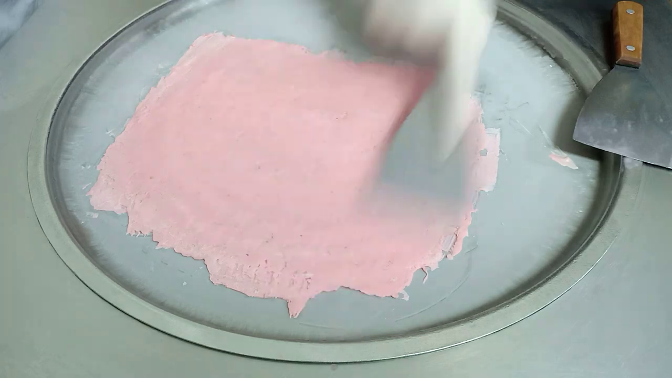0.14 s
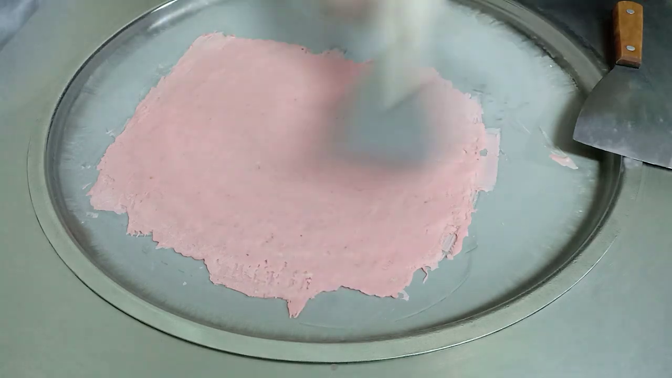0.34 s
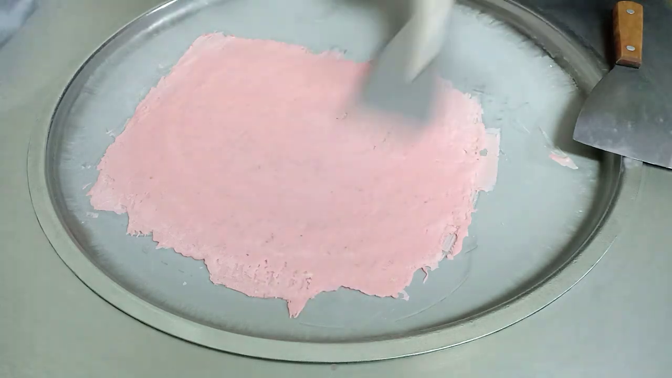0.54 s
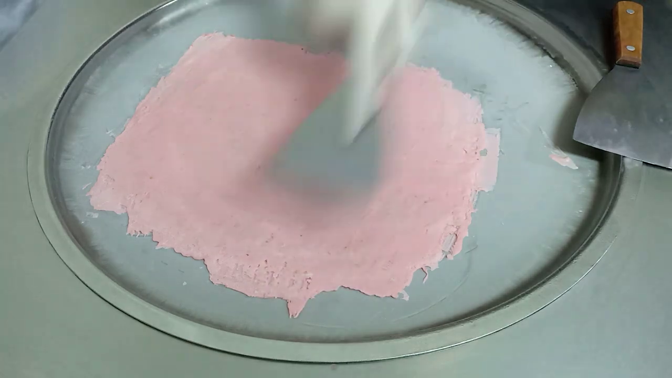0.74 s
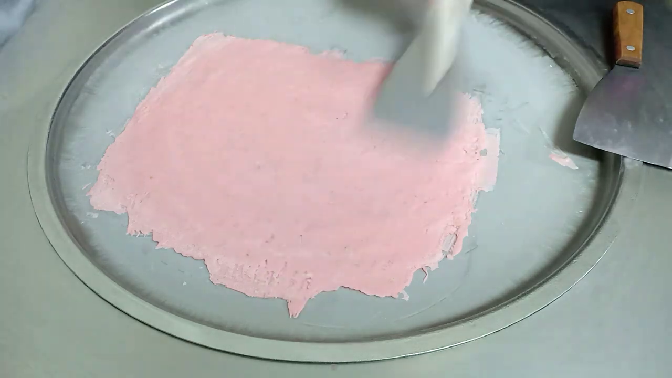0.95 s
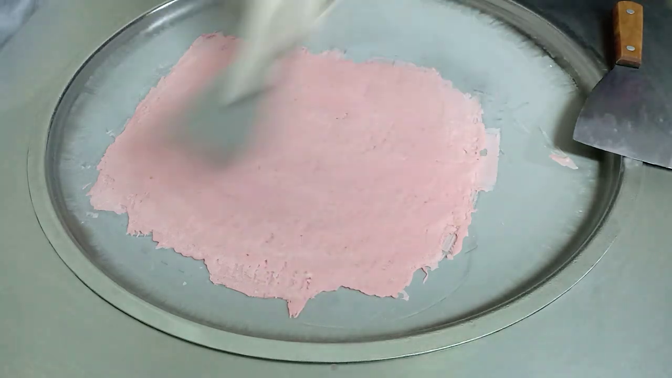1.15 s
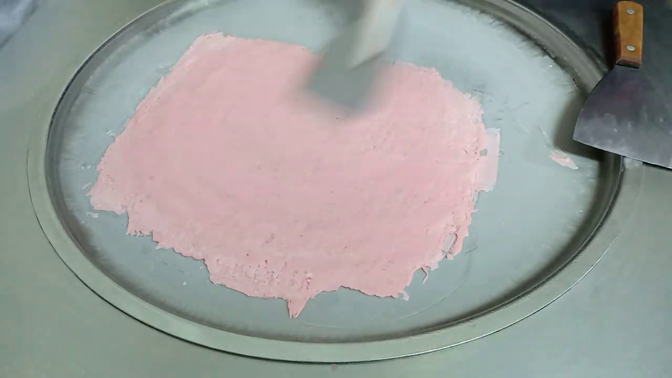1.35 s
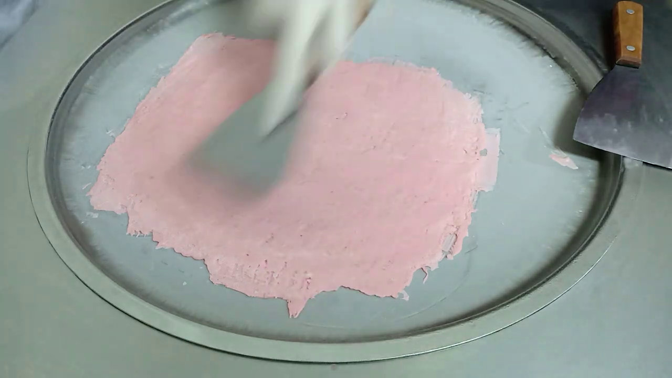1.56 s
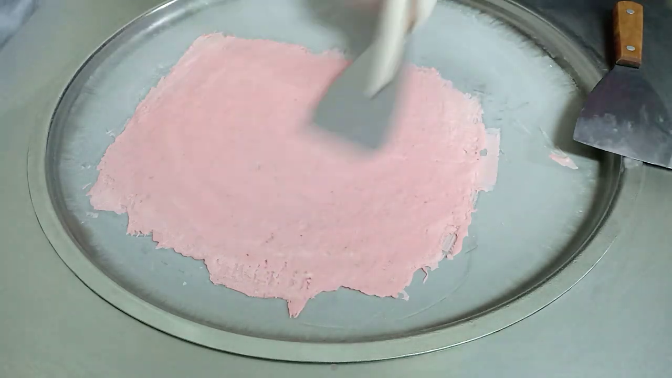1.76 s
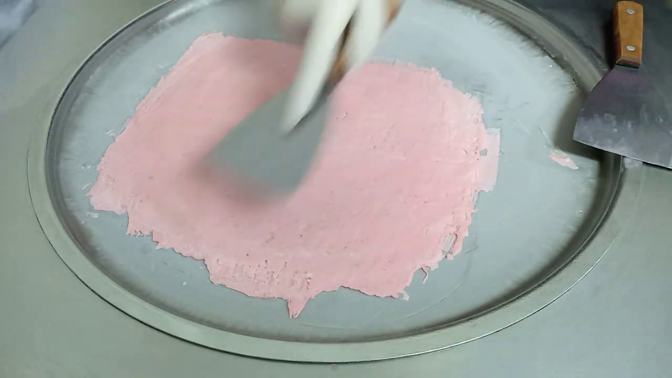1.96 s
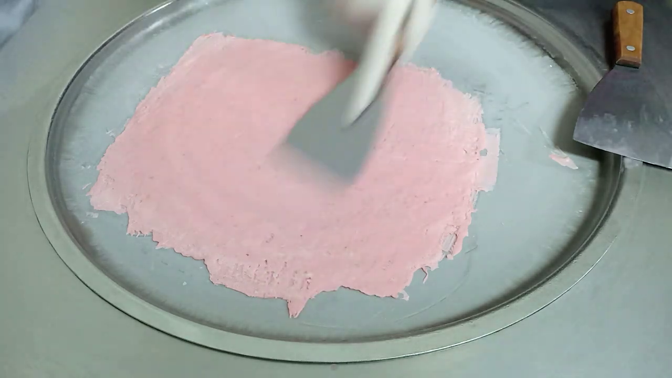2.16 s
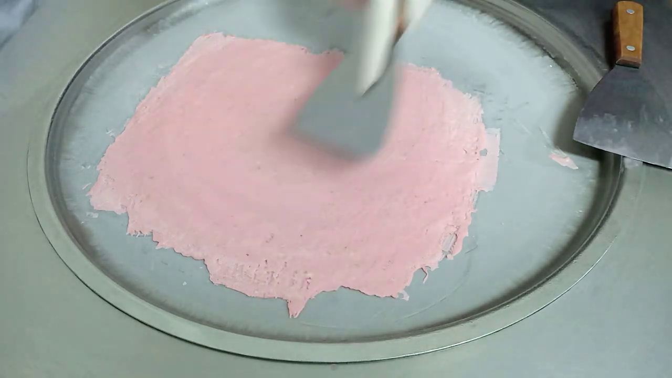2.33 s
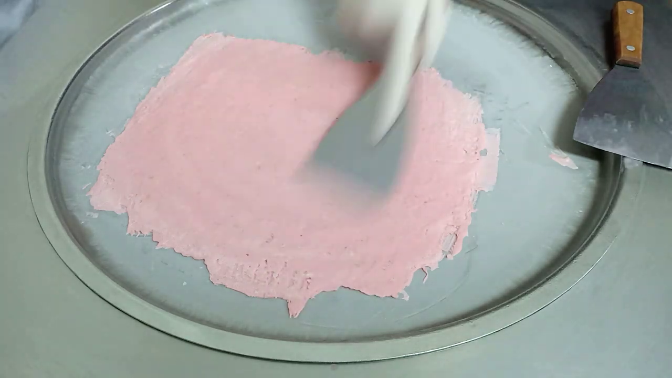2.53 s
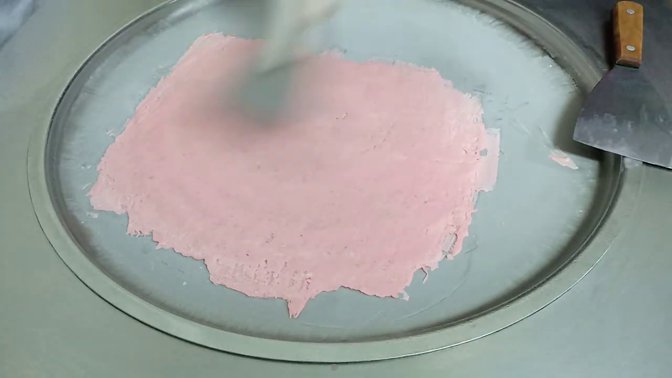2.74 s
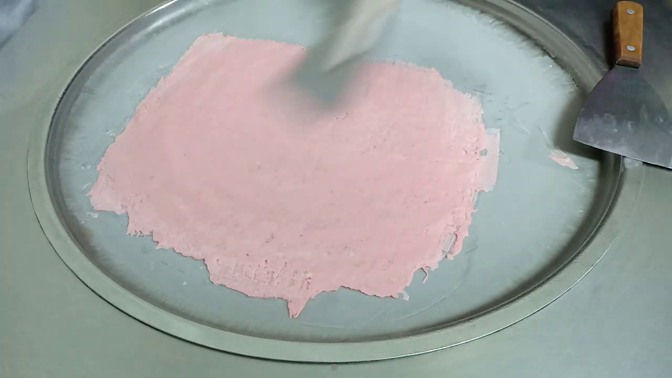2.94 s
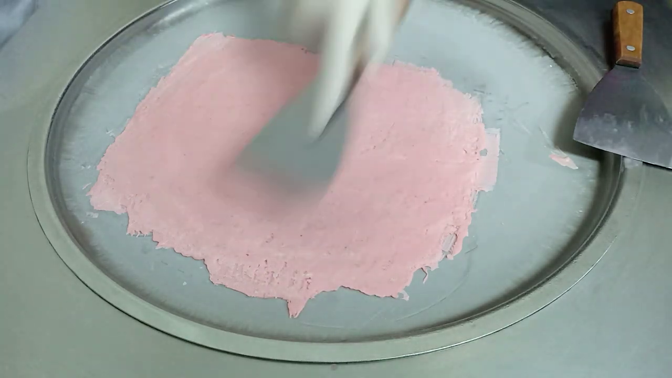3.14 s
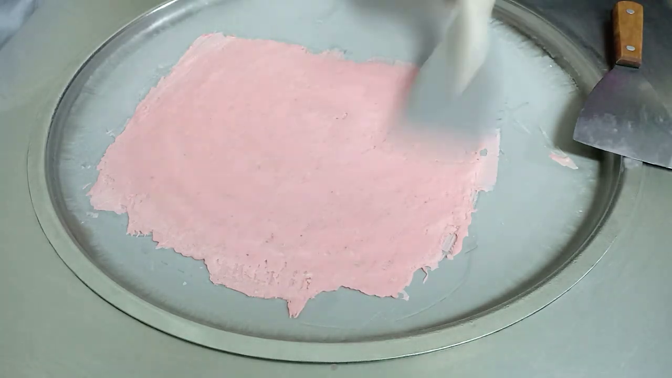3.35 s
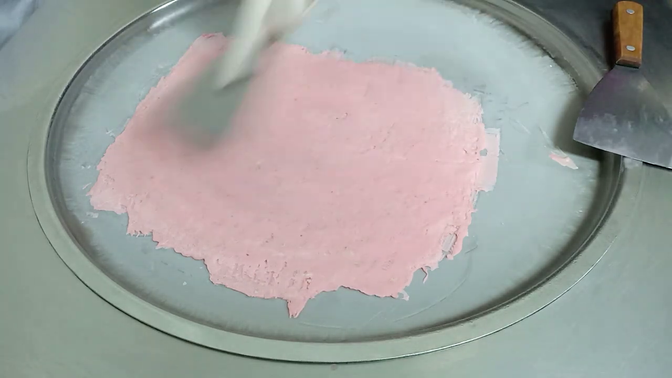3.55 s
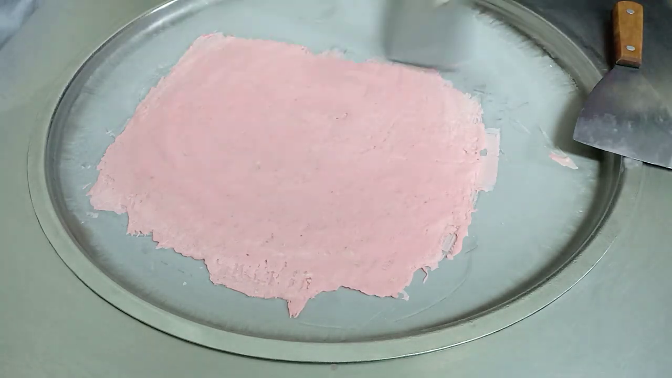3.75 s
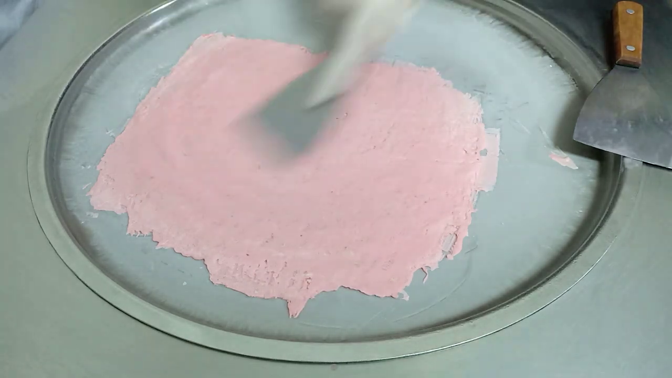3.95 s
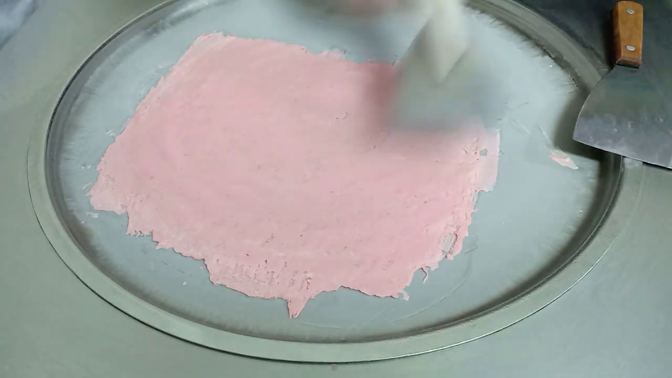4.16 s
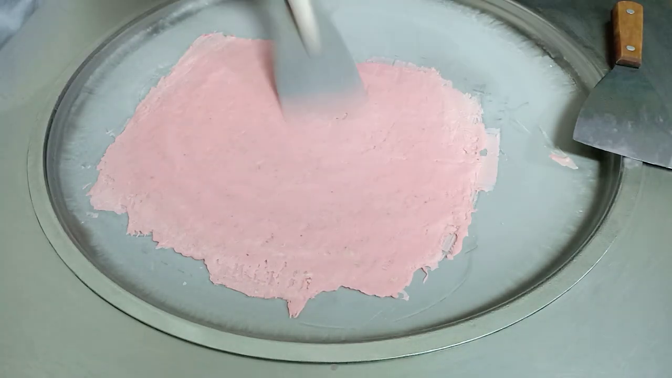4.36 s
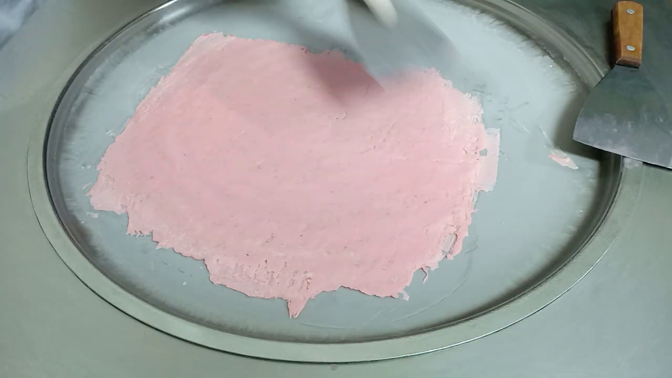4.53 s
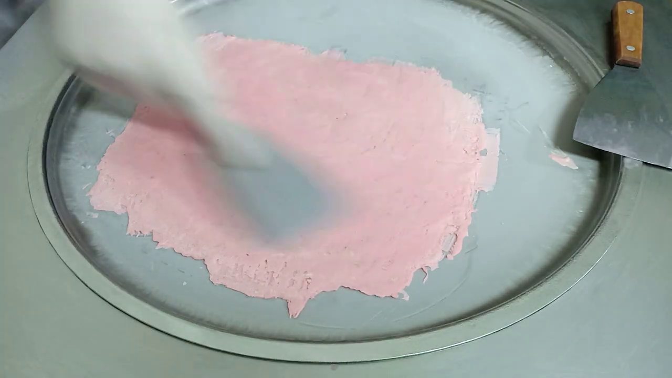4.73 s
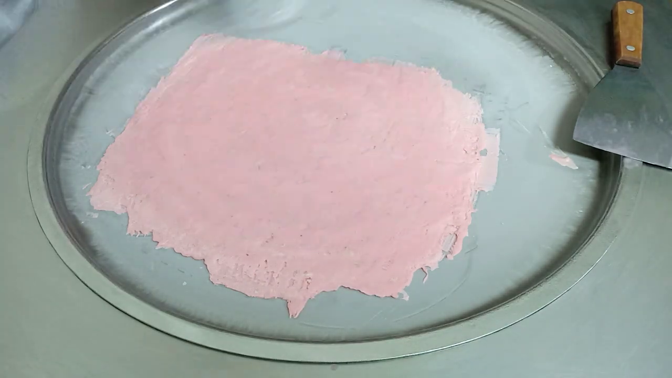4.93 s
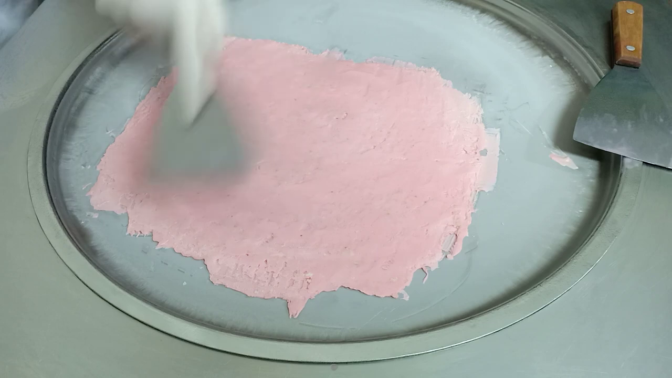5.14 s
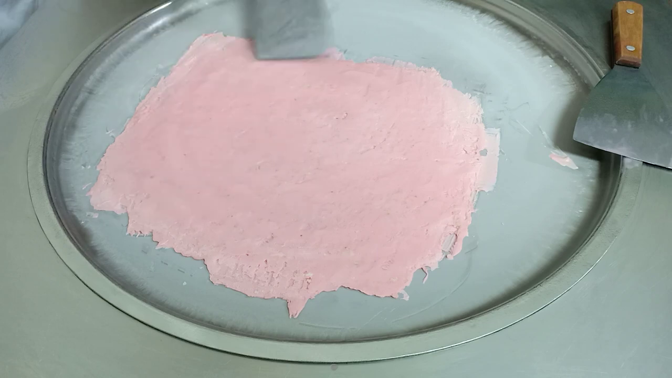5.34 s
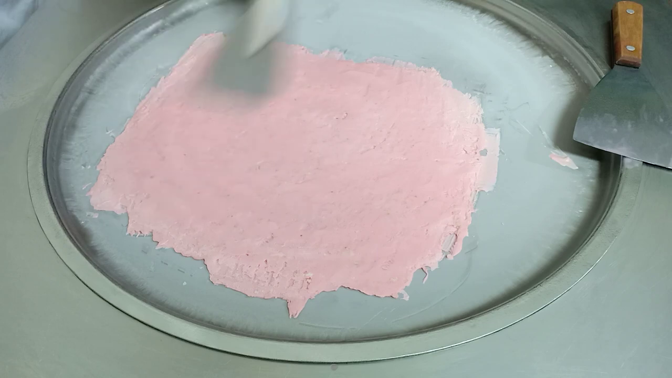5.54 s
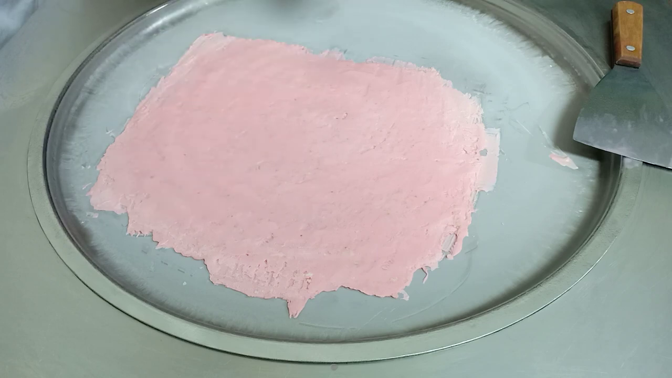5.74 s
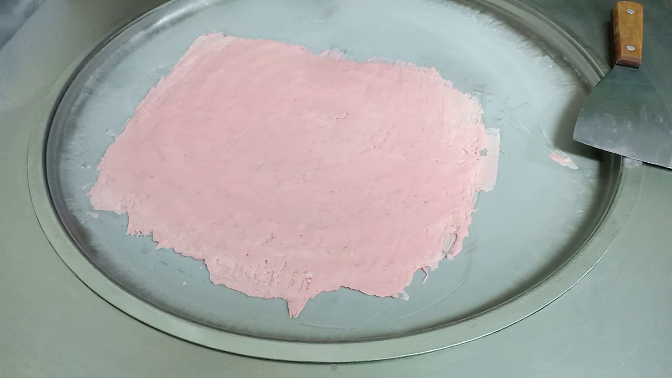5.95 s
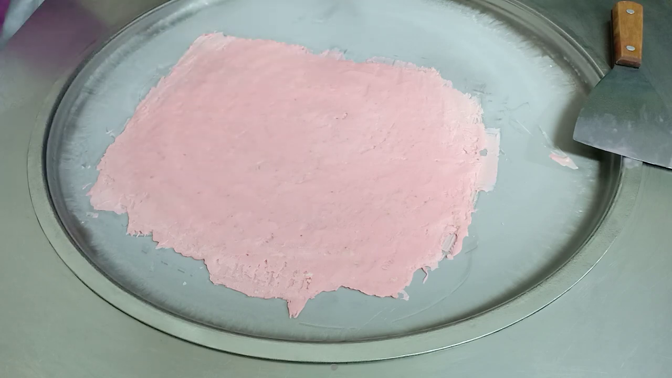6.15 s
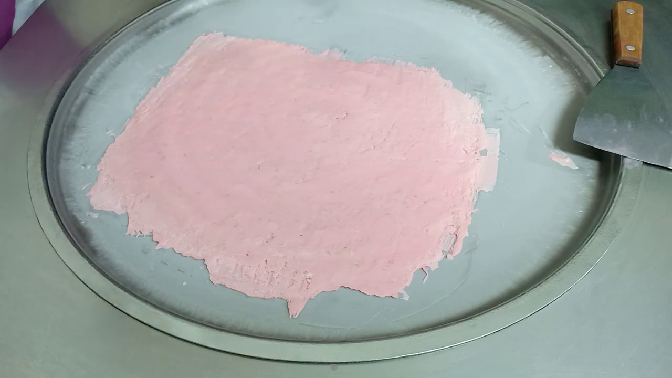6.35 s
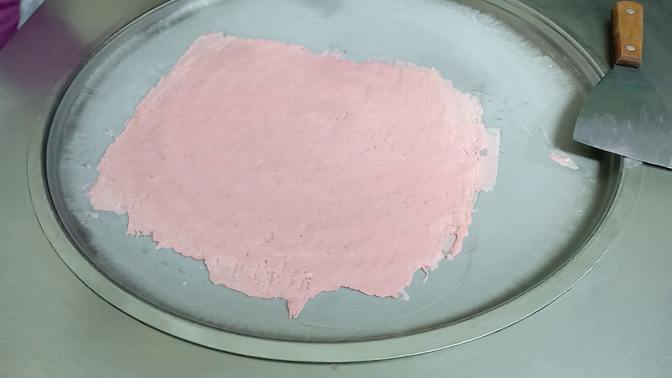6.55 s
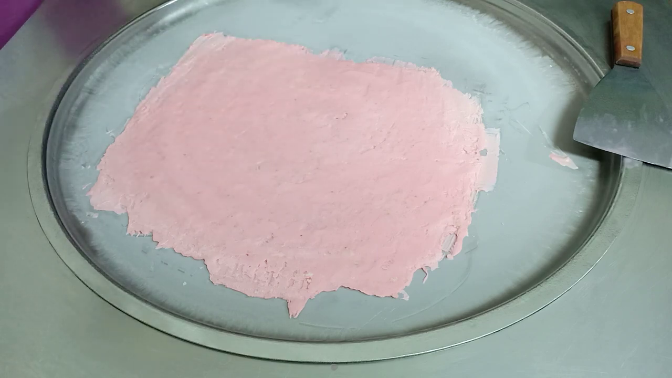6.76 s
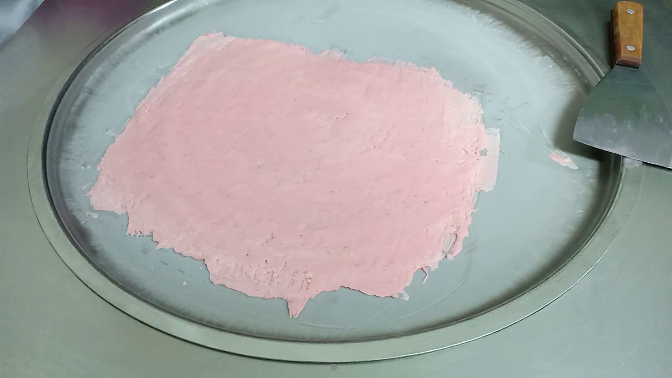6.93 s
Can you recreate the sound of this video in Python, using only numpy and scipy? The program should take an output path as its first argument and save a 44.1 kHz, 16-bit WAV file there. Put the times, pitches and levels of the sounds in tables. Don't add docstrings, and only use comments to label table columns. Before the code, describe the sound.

A metal spatula slaps and scrapes frozen cream on a cold steel plate in brisk regular strokes, then stops, leaving faint machine hum and tiny clicks.

```python
import sys
import numpy as np
from scipy import signal
from scipy.fft import rfft, irfft
from scipy.io import wavfile
from scipy.ndimage import uniform_filter1d

SR = 44100
rng = np.random.default_rng(int(sys.argv[2]) if len(sys.argv) > 2 else 0)


def put_to_file(sound):
    columns = np.atleast_2d(sound).T
    safe = np.clip(columns, -1, 1)
    whole_steps = np.round(safe * 32767)
    wavfile.write(sys.argv[1], SR, whole_steps.astype(np.int16))


def amplitude_ratio(level_db):
    exponent = np.asarray(level_db, float) / 20
    return 10 ** exponent


N = 308259


def unit(x):
    return x / np.sqrt(np.mean(x ** 2))


def on_log_hz(table, size):
    hz, value = np.transpose(table)
    bins_hz = np.arange(size // 2 + 1) * SR / size
    return np.interp(np.log(bins_hz + 1), np.log(hz), value)


def colour(x, table, even=False):
    size, spectrum = x.shape[-1], rfft(x)
    log_gain = np.log(amplitude_ratio(on_log_hz(table, size)))
    if even:
        smooth_power = uniform_filter1d(np.abs(spectrum) ** 2, size=size // 64)
        log_gain = log_gain - np.log(smooth_power + 1e-18) / 2
    cepstrum = irfft(log_gain, size)
    cepstrum[..., 1:size // 2] *= 2
    cepstrum[..., size // 2 + 1:] = 0
    return irfft(spectrum * np.exp(rfft(cepstrum)), size)


def above(x, hz):
    return signal.sosfilt(signal.butter(4, hz, "high", fs=SR, output="sos"), x)


def ring(x, hz, width_hz):
    return signal.lfilter(*signal.iirpeak(min(hz, .45 * SR), hz / width_hz, fs=SR), x)


def body(x, modes):
    return sum((-1) ** k * amplitude_ratio(db) * ring(x, hz, width) for k, (hz, width, db) in enumerate(modes))


def blend(mid, side, likeness):
    c = np.clip(likeness, 0, 1)
    return np.sqrt(1 + c) * mid + np.sqrt(1 - c) * side * np.array([[1], [-1]])


def pair(size, likeness):
    mid, side = rng.standard_normal((2, size))
    return blend(mid, side, likeness)


def flicker(rate):
    hold = int(SR / rate)
    steps = np.repeat(rng.standard_normal(N // hold + 1), hold)
    return unit(uniform_filter1d(steps, hold)[:N])


def add(out, sound, s):
    i = int(s * SR)
    out[:, i:i + sound.shape[1]] += sound[:, :N - i]


# start in seconds [s], peak level [dB], clack centre [Hz],
# blade brightness [dB], left minus right [dB].
SLAP_EVENTS = [(0.0948, -6, 2290, -28, 0.5), (0.483, -7, 1540, -13, -4.5), (0.8653, -4, 2010, -15, -1.5),
               (1.288, -4, 3030, -7.5, -4.5), (1.6698, -4.5, 2160, 0.5, -6), (2.0995, -7.5, 2290, -13, -1),
               (2.5151, -14, 2840, -16.5, -4), (2.8841, -20.5, 1630, -8, -6), (3.263, -3, 1480, -3, 0),
               (3.6604, -8.5, 2280, -5, 2), (3.9862, -7, 2900, -10.5, -1.5),
               (4.2921, -3.5, 2120, -12.5, -4.5), (4.6962, -24, 2680, -7, -1),
               (5.2345, -3.5, 1760, -19.5, -1.5), (5.5492, -4.5, 2130, -4, -1)]
# delay [s], bounce level [dB], edge sizzle [dB].
BLADE_BOUNCES = [(.0029, -9, 3.5), (.0027, 0, -0.5), (.0031, -4.5, -1), (.0023, 2, 2), (.003, -6.5, 4.5),
                 (.0036, -0.5, 3), (0.0036, -1.5, -1.5), (.0023, -9, 7), (.0033, -4, 2.5),
                 (.0026, -4.5, -21), (0.00085, 0, -11), (.0027, 3.5, .5), (.0025, 1.5, -18),
                 (0.0032, -12.5, 0), (0.0018, -8, -6.5)]
# frequency [Hz], level [dB per Hz].
CLACK_COLOUR = [(180, -31), (300, -3.5), (1020, -12), (1450, -5.5), (2170, -1.5), (3300, -9), (4770, -5.5),
                (7630, -16.5), (9980, -29.5), (11600, -19), (14000, -20.5), (16500, -38)]
# frequency [Hz], width [Hz], level [dB].
BLADE_TONES = [(1440, 53, 1.5), (2060, 98, -3), (2290, 60, -8.5), (2320, 120, -6.5), (2745, 80, -6.5),
               (4524, 150, -12.5), (4745, 190, -11), (5800, 66, -13)]


def strike(since):
    return np.clip(since / 0.00029, 0, None) * np.exp(1 - np.abs(since) / 0.00055)


def slaps():
    out, t = np.zeros((2, N)), np.arange(SR // 4) / SR
    for (s, db, hz, bright_db, pan_db), (delay, bounce_db, sizzle_db) in zip(SLAP_EVENTS, BLADE_BOUNCES):
        force = strike(t) + amplitude_ratio(bounce_db + 6.5) * strike(t - delay)
        force = force + .2 * np.exp(-t / .004) + .06 * np.exp(-t / 0.0084)
        crack = colour(pair(len(t), 0.76) * force, CLACK_COLOUR, even=True)
        clack = crack + 2.01 * ring(crack, hz, 500)
        clack += amplitude_ratio(bright_db + 14.5) * ring(crack, 4600, 1700)
        clack += 0.52 * body(crack, BLADE_TONES)
        clack += (amplitude_ratio(sizzle_db) - 1) * above(crack, 6500)
        level = amplitude_ratio(db + 3.5 + np.array([[pan_db], [-pan_db]]) / 2)
        add(out, level * clack / np.abs(clack.mean(0)).max(), s - .0004)
    return out


# start in seconds [s], pat peak [dB], pat pitch [Hz], thump peak [dB].
CREAM_PATS = [(0.096, -21.5, 1470, -26), (0.4834, -7.5, 1526, -36), (0.8632, -14.5, 1610, -25.5),
              (1.2853, -6, 1690, -22.5), (1.6669, -20, 1090, -42), (2.0976, -16, 1190, -29.5),
              (2.5126, -14.5, 600, -41), (2.8836, -12, 706, -30.5), (3.2623, -5, 1530, -32),
              (3.6588, -12.5, 695, -22), (3.983, -8.5, 1600, -32), (4.292, -6, 1430, -59),
              (4.694, -31, 557, -32), (5.234, -13.5, 1098, -34.5), (5.5479, -12, 910, -27.5)]
# frequency [Hz], width [Hz], level [dB].
PLATE_TONES = [(74.9, 14, -17), (118.9, 8, -6), (166.8, 12.2, -0.5), (235.5, 36.6, -8), (259.4, 18, -2),
               (327.5, 13.1, -1), (441.7, 15, -6.5), (517.3, 14, -10), (588, 19, -9), (672.7, 21, -13),
               (756, 8.4, -22)]


def pats():
    out, t = np.zeros((2, N)), np.arange(SR // 2) / SR
    push = np.sin(np.pi * np.clip(t / .003, 0, 1)) ** 2
    for s, pat_db, hz, thump_db in CREAM_PATS:
        pull = -np.sin(2 * np.pi * hz * t) * np.exp(-t * hz / 0.6)
        squash = ring(ring(pair(len(t), 0.4), 2600, 3500), 2600, 3500)
        squash = unit(ring(squash, 2600, 5000)) * np.exp(-t / 0.00038)
        soft_start = 1 - np.exp(-(t / 0.00031) ** 2)
        pat = (pull + 0.41 * squash) * soft_start
        thump = -body(push * (1 + .5 * pair(len(t), .9)), PLATE_TONES)
        add(out, amplitude_ratio(pat_db + 3.5) * pat + amplitude_ratio(thump_db - 3.0) * thump / np.abs(thump).max(), s)
    return out


BOOM_PEAKS_DB = [-29.5, -38.5, -42.5, -34.5, -35, -37.5, -38.5, -30, -35, -36.5, -35.5, -37, -50, -37,
                 -28.5]


def booms():
    boom_hz, split_hz, t60_s = 167.8, 7.4, 0.87
    out, t = np.zeros((2, N)), np.arange(SR) / SR
    beating = np.sin(np.pi * split_hz * t) * np.sin(2 * np.pi * boom_hz * t)
    tone = beating * amplitude_ratio(-60 * t / t60_s)
    for (s, *_), db in zip(SLAP_EVENTS, BOOM_PEAKS_DB):
        add(out, amplitude_ratio(db) * np.tile(tone / tone.max(), (2, 1)), s)
    return out


# hiss level [dB], hiss fade [dB per s], contact time [s],
# plate drum level [dB], drum hold [s].
DRAG_STROKES = [(-22.5, 116, 0.16, -29, 0.087), (-25.5, 192, .12, -30, 0.036), (-26, 137, 0.14, -30.5, .03),
                (-29, 114, 0.14, -33, .08), (-28.5, 141.5, 0.15, -31, 0.014), (-35, 81, .12, -31.5, 0.016),
                (-29, 170, 0.126, -36, .05), (-36.5, 62, 0.1, -30.5, 0.02), (-30, 100, 0.053, -31.5, .02),
                (-33, 11.5, 0.047, -30.5, 0.065), (-30.5, 174, .1, -32.5, 0.048),
                (-28.5, 86.5, 0.19, -28.5, 0.015), (-45.5, 2.5, 0.22, -38, 0.11),
                (-30, 111, .11, -31.5, 0.016), (-28, 84, 0.059, -31.5, 0.057)]
# peak time [s], hiss level [dB],
# plate drum level [dB], blade tone share [dB], hiss fade [dB per s].
WRIST_PRESSES = [(0.0, -69.5, -39.5, -7, 202), (0.261, -33, -36, -4, 217), (0.593, -41, -43.5, -12.5, 152),
                 (1.043, -44, -40.5, -8.5, 250), (1.445, -48, -42, -11, 155.5), (1.8, -44, -43.5, -8, 156),
                 (2.25, -49, -44, -10, 117), (2.658, -39, -35.5, -9, 232), (3.015, -42, -39, -13, 182),
                 (3.324, -32.5, -37, -7, 169), (3.442, -33.5, -33.5, -10, 244),
                 (4.06, -34.5, -34.5, -26, 190), (4.453, -45.5, -42, -8.5, 350),
                 (4.61, -49.5, -51.5, -20, 63), (4.975, -30.5, -30.5, -4, 234), (5.367, -40, -37, -12, 178),
                 (5.51, -54.5, -41, 0, 194)]


def peak_db(since, rise, fade):
    return np.where(since < 0, rise * since, -fade * since)


def stroke_curves():
    t = np.arange(0, N / SR + .002, .001)
    falls = np.array([0] + [slap[0] for slap in SLAP_EVENTS] + [t[-1] + 1])
    turn = np.searchsorted(falls, t, "right") - 1
    since = t - falls[turn]
    silent = -200 * (turn == 0)

    hiss_db, fade, contact, drum_db, hold = np.transpose(DRAG_STROKES)[:, turn - 1]
    skid_db = 12.5 * np.exp(-since / .008)
    release_db = -117 * np.clip(since - contact, 0, None)
    dragged = amplitude_ratio(silent + hiss_db + skid_db - fade * since + release_db) ** 2
    drum = amplitude_ratio(silent + drum_db - 62.5 * np.clip(since - hold, 0, None)) ** 2

    s, press_db, press_drum_db, press_tone_db, press_fade = np.transpose(WRIST_PRESSES)[:, :, None]
    pressed = amplitude_ratio(press_db + peak_db(t - s, 241.5, press_fade)) ** 2
    drum = drum + np.sum(amplitude_ratio(press_drum_db + peak_db(t - s, 153, 80)) ** 2, axis=0)

    work_ends_s = 5.76
    swing = amplitude_ratio(-57.5 + 6.5 * since - 60 * np.clip(t - work_ends_s, 0, None)) ** 2
    hiss = dragged + pressed.sum(axis=0) + swing

    def share(drag_db, presses_db, swing_db):
        presses = np.sum(amplitude_ratio(presses_db) ** 2 * pressed, axis=0)
        return (amplitude_ratio(drag_db) ** 2 * dragged + presses + amplitude_ratio(swing_db) ** 2 * swing) / hiss

    blade_tone = share(-14, press_tone_db, -12)
    edge = share(-20.5, -26.5, -19.5)
    lift_db = -5 * np.exp(-(falls[turn + 1] - t) / .014)
    curves = [10 * np.log10(p + 1e-30) for p in (hiss, drum, blade_tone, edge)] + [lift_db]
    return [np.interp(np.arange(N) / SR, t, curve) for curve in curves]


# frequency [Hz], level [dB per Hz].
DRAG_COLOUR = [(410, -21), (700, -1), (924, -12.5), (1200, -12.5), (1450, -10), (1840, -7.5), (2270, 0),
               (3290, -13), (4340, -6.5), (6800, -20), (8080, -34), (14500, -26), (15400, -32),
               (16500, -78)]


def drag():
    hiss_db, drum_db, tone_db, edge_db, lift_db = stroke_curves()
    grit = pair(N, 0.17) * amplitude_ratio(1.6 * flicker(400) + 2.12 * flicker(45))
    hiss = colour(grit, DRAG_COLOUR)
    edge = above(hiss, 6900)
    blade = unit(hiss - edge) + amplitude_ratio(tone_db) * unit(body(grit, BLADE_TONES)) + amplitude_ratio(edge_db) * unit(edge)
    rub = pair(N, 0.97) * amplitude_ratio(1.0 * flicker(25))
    dull_rub = ring(ring(pair(N, 0.21), 450, 670), 450, 770)
    plate = unit(body(rub, PLATE_TONES)) + amplitude_ratio(-12.0) * unit(dull_rub)
    lean = amplitude_ratio(np.array([[-.9], [.9]]))
    return lean * amplitude_ratio(lift_db) * (amplitude_ratio(hiss_db - 1.0) * blade + amplitude_ratio(drum_db - 1.5) * plate)


# start in seconds [s], peak level [dB], tone [Hz], ring over click [dB].
FROST_CATCHES = [(0.1962, -21, 1460, 2), (0.2628, -22, 2020, -6), (0.588, -24.5, 1480, 3),
                 (0.611, -27.5, 1480, -10), (1.0004, -30, 1430, 6), (1.0407, -30.5, 1450, 2),
                 (1.4187, -21.5, 1416, -1), (1.7762, -23, 1406, 7), (2.2235, -32, 1460, 3),
                 (2.5765, -25.5, 1360, 1), (2.6324, -25.5, 1440, -1), (3.0035, -30, 1400, -1),
                 (3.3189, -18, 1440, 3), (3.413, -25, 1470, -8), (3.428, -24.5, 1410, 12),
                 (4.0562, -21, 1460, 1), (4.3974, -26.5, 1480, -2), (4.453, -31, 2680, -15),
                 (4.7825, -41.5, 2370, 0), (4.93, -39, 1460, 3), (4.9533, -19, 1440, 2),
                 (5.3438, -22, 1640, -7), (5.369, -22, 1436, -1), (5.5109, -48, 2120, -10),
                 (0.285, -29, 1440, 15), (0.915, -26.5, 1420, 11), (1.363, -28, 1430, 7),
                 (3.467, -33.5, 1430, 8), (3.51, -38, 1430, 14)]
# start in seconds [s], peak level [dB], tone [Hz], ring over click [dB].
CHIME_CATCHES = [
    (4.699, -32.5, 2750, 12),
    (4.974, -21.5, 2745, 14.5),
    (4.989, -30, 2745, 16),
    (5.027, -41, 2745, 13),
    (5.048, -45, 2745, 16),
]


def ticks():
    out, t = np.zeros((2, N)), np.arange(SR // 5) / SR
    catches = [(row, 85) for row in FROST_CATCHES] + [(row, 32) for row in CHIME_CATCHES]
    for (s, db, hz, ring_db), width_hz in catches:
        scrape = pair(len(t), 0.95) * (np.exp(-t / 0.0066) + 0.31 * np.exp(-t / .012))
        click = colour(scrape, DRAG_COLOUR, even=True)
        tone = ring(click, hz, width_hz) + 0.21 * ring(click, 1.9 * hz, 120)
        sound = click / np.abs(click).max() + amplitude_ratio(ring_db) * tone / np.abs(tone).max()
        add(out, amplitude_ratio(db + 0.5) * sound / (1 + amplitude_ratio(ring_db)), s)
    return out


# start in seconds [s], peak level [dB], centre [Hz].
FAR_CLICKS = [
    (5.874, -54, 12500),
    (6.163, -38, 5190),
    (6.360, -50, 11400),
    (6.361, -43, 4800),
    (6.585, -58, 5030),
    (6.715, -62, 12980),
    (6.918, -61, 6500),
]


def far_clicks():
    out, t = np.zeros((2, N)), np.arange(SR // 5) / SR
    for s, db, hz in FAR_CLICKS:
        burst = pair(len(t), 0.53) * np.exp(-t / 0.0029)
        click = ring(ring(burst, hz, .45 * hz), hz, .45 * hz)
        add(out, amplitude_ratio(db) * click / np.abs(click).max(), s)
    return out


# band centre [Hz], time to fall 60 dB [s], level [dB].
ROOM_BANDS = [(148, 0.28, -4.5), (400, 0.42, -10), (1010, 0.33, -11), (2200, 0.21, -13), (4520, 0.083, -19),
              (9250, .22, -19.5), (14000, 0.22, -12)]


def room(x):
    t = np.arange(SR * 3 // 4) / SR
    tail = 0
    for hz, t60, db in ROOM_BANDS:
        band = ring(pair(len(t), 160 / hz), hz, 0.86 * hz)
        tail = tail + amplitude_ratio(db - 60 * t / t60) * band / np.sqrt(t60 * SR / 14)
    tail = tail * np.clip(t / 0.0035 - .4, 0, 1)
    return signal.fftconvolve(x.mean(0, keepdims=True), tail, axes=1)[:, :N]


# frequency [Hz], level [dB per Hz].
FAN_COLOUR = [(15, -27.5), (25, -2.5), (49, -19.5), (122, -11), (208, -15.5), (397, -20), (467, -15),
              (534, -20), (1100, -24.5), (2460, -21.5), (3400, -29.5), (5090, -29.5), (9690, -45),
              (13700, -38), (15300, -54)]
# frequency [Hz], likeness [0-1].
FAN_ALIKE = [(60, 0.6), (130, 0.94), (290, 0.7), (640, 0.1), (1410, 0), (3100, 0.1), (6820, 0),
             (15000, 0.03)]
# frequency [Hz], level [dB rms].
HUM_TONES = [(120, -61.5), (77, -80)]


def chiller():
    mid, side = rfft(rng.standard_normal((2, N)))
    air = colour(irfft(blend(mid, side, on_log_hz(FAN_ALIKE, N)), N), FAN_COLOUR)
    t = np.arange(N) / SR
    hum = sum(amplitude_ratio(db + 5.0 + .5 * flicker(3.2)) * np.sin(2 * np.pi * hz * t) for hz, db in HUM_TONES)
    fan_db = -58.5
    return amplitude_ratio(fan_db + 2.5 + 0.27 * flicker(3.7)) * unit(air) + hum


def scene():
    blows = pats() + slaps() + ticks() + far_clicks()
    near = blows + drag() + booms()
    port_lag_s = .00008
    lag = np.exp(-2j * np.pi * np.fft.rfftfreq(N, 1 / SR) * port_lag_s)
    near[0] = irfft(rfft(near[0]) * lag, N)
    return near + amplitude_ratio(2) * room(blows) + amplitude_ratio(np.array([[-3.0], [-2.0]])) * chiller()


def low_pass(x):
    return signal.sosfilt(signal.butter(12, 16840, fs=SR, output="sos"), x)


def record(dry):
    heard = signal.sosfilt(signal.butter(3, 52, "high", fs=SR, output="sos"), dry)
    heard = signal.sosfilt(signal.butter(8, 16200, fs=SR, output="sos"), heard)
    top = .97
    mix = heard / (1 + np.abs(heard / top) ** 4) ** (1 / 4)
    return low_pass(mix)


dry = scene()
out = record(dry)
put_to_file(out)
```